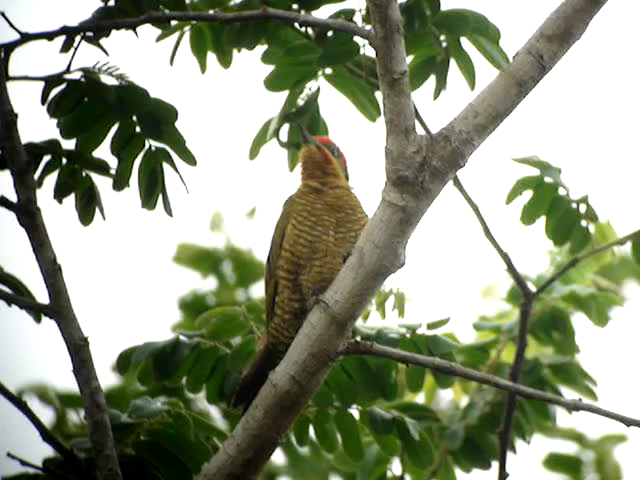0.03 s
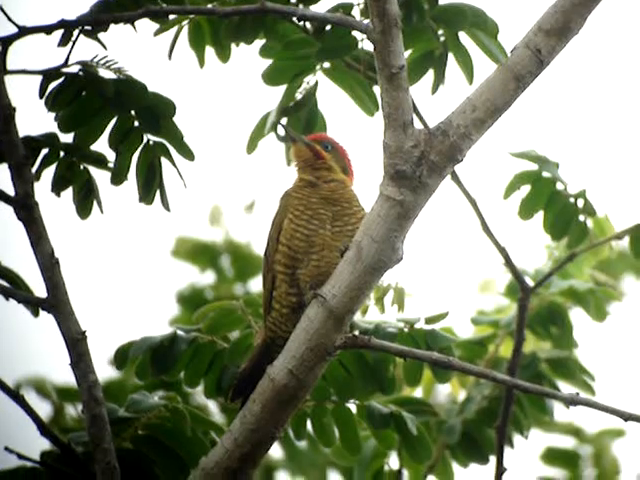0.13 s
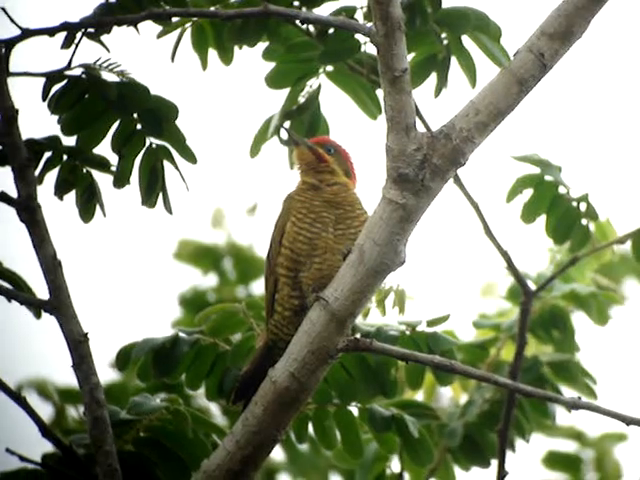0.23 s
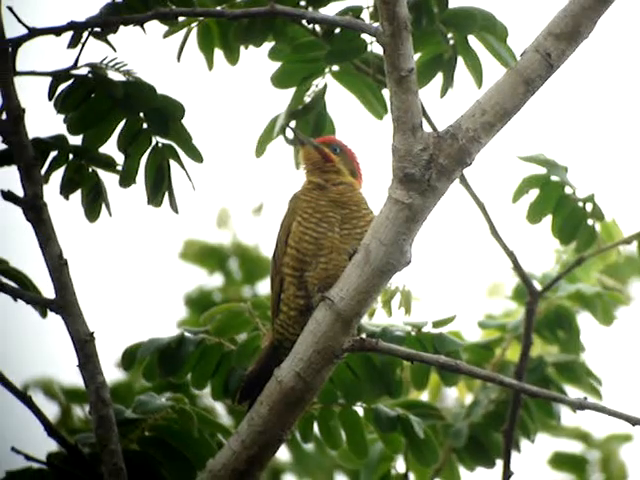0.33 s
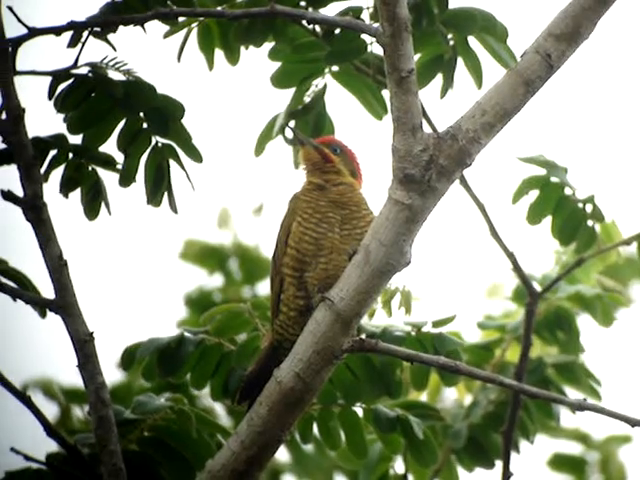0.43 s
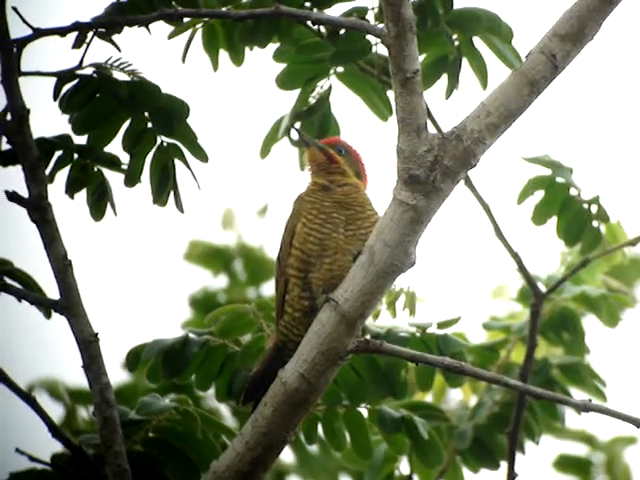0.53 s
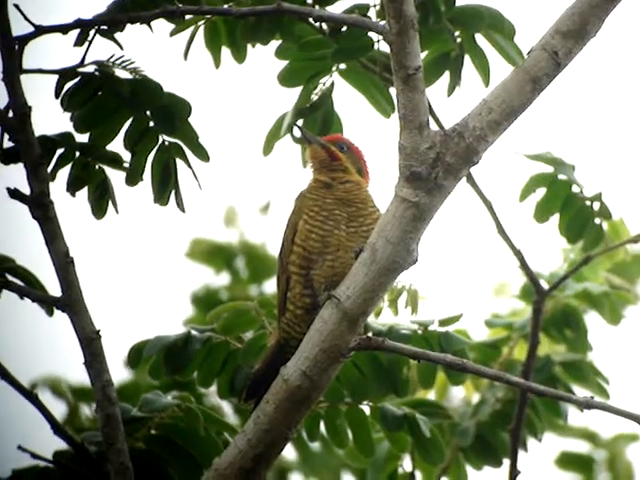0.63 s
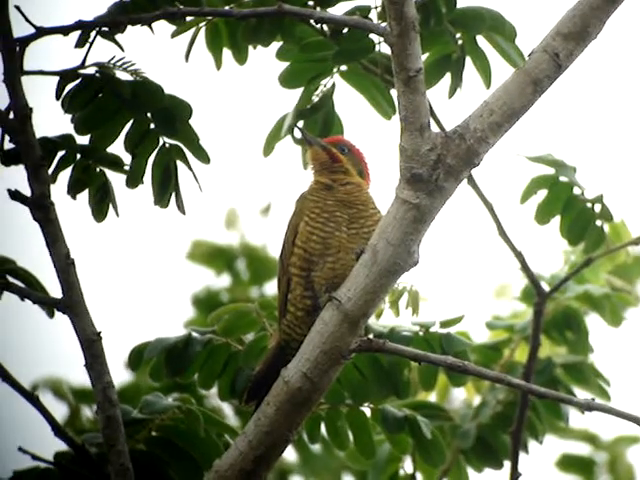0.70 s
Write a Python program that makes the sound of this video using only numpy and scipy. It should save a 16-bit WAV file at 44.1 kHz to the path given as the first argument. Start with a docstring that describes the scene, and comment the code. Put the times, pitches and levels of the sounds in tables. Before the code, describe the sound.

A high, slightly pulsing insect hiss starts with a soft low bump at 0.1 seconds and continues throughout, over a gentle wash of distant foliage. A small click snaps near the microphone just afterward. From 0.2 to 0.7 seconds a bird gives five short, low, falling chirps. Farther birds warble faintly on and off, with thin whistles from 0.8 to 1.4 seconds, lightly echoing among the trees.

```python
"""A warm wetland: insects hiss in the trees, their scraping filtered by narrow resonances, over a soft
wash of distant foliage. One bird gives five low falling chirps; farther birds warble and whistle
faintly, all as gliding notes with a diffuse echo from the trees. The sound switches on with a soft low
bump, and a small hard part snaps once near the microphone, ringing in its damped modes."""
import sys
import numpy as np
from scipy import signal
from scipy.fft import rfft, irfft
from scipy.io import wavfile
from scipy.ndimage import uniform_filter1d

SR = 44100
rng = np.random.default_rng(int(sys.argv[2]) if len(sys.argv) > 2 else 0)


def dump_mix(stems):
    """Bounce the given channels to the path in sys.argv[1] as a 16-bit WAV at rate SR."""
    frames = np.atleast_2d(stems).T  # one column per channel
    limited = np.clip(frames, -1, 1)  # hard clip at full scale
    pcm = np.round(limited * 32767).astype(np.int16)
    wavfile.write(sys.argv[1], SR, pcm)


N = 68355
T = np.arange(N) / SR


def amp(db):
    """Amplitude ratio of a level in decibels."""
    return 10 ** (np.asarray(db) / 20)


def unit(x):
    """Normalisation to rms 1."""
    return x / np.sqrt(np.mean(x ** 2) + 1e-20)


def add(mix, start_s, sound):
    """Superposition: a sound joins the mix at its start time."""
    part = mix[max(round(start_s * SR), 0):][:len(sound)]
    part += sound[:len(part)]


def drift(rate_hz):
    """Low-passed noise: a random wander of rms 1."""
    lowpass = np.exp(-(np.fft.rfftfreq(N, 1 / SR) / rate_hz) ** 2)
    return unit(irfft(rfft(rng.standard_normal(N)) * lowpass, N))


def resonate(x, hz, width_hz):
    """Forced response of a double-pole resonance, steady or gliding, at rms 1."""
    carrier = np.exp(2j * np.pi * np.cumsum(hz * np.ones(len(x))) / SR)
    pole = np.exp(-np.pi * abs(width_hz) / SR)
    baseband = signal.lfilter([1], [1, -2 * pole, pole * pole], x / carrier)
    return unit((carrier * baseband).real)


def progress(length_s):
    """Normalised time, 0 to 1 over a note."""
    return np.linspace(0, 1, max(round(length_s * SR), 2))


def swell(u):
    """Amplitude envelope with a rounded rise and fall."""
    return np.sqrt(abs(np.sin(np.pi * u)))


def tone(hz):
    """A sinusoid of rms 1 whose phase is the integral of its frequency."""
    return np.sqrt(2) * np.sin(2 * np.pi * (np.cumsum(hz) / SR + rng.random()))


def trees(x, wet_db, t60_s=0.28, echoes_per_s=2000):
    """Scattering by trees adds a diffuse echo that decays exponentially."""
    t = T[:SR // 2]
    echoes = rng.standard_normal(len(t)) * (rng.random(len(t)) < echoes_per_s / SR)
    tail = echoes * amp(-60 * t / t60_s) * (t > .006)
    return x + amp(wet_db) * signal.fftconvolve(x, tail / np.linalg.norm(tail))[:N]


def air(level_db=-56, patchy_db=1.94):
    """Distant foliage gives broadband noise, its spectrum faintly patchy in time and frequency."""
    # Each row: frequency in Hz, relative spectral density in dB.
    spectrum = [(25, -18.5), (80, -9.5), (160, -4), (300, 0), (600, -1.83), (1100, -3.5), (2400, -4.5),
                (4000, -9), (7500, -10), (10000, -16)]
    knots_hz, knots_db = np.transpose(spectrum)
    hz, _, frames = signal.stft(rng.standard_normal(N), SR, nperseg=1024, noverlap=768)
    patches = uniform_filter1d(rng.standard_normal(frames.shape), size=10, axis=0)
    patches = unit(uniform_filter1d(patches, size=10, axis=1))
    shape_db = np.interp(np.log(hz + 1), np.log(knots_hz), knots_db)
    frames *= amp(shape_db[:, None] + patchy_db * patches)
    return amp(level_db) * unit(signal.istft(frames, nperseg=1024, noverlap=768)[1][:N])


def whistlers(far_start_s=.79, far_length_s=.35, far_db=-63.5):
    """Nearly pure tones seesaw high up; a far, blurred whistle sinks as narrowband noise."""
    # Each row: start and length in seconds, first and last frequency in Hz, level in dB.
    whistles = [(1.082, .05, 4770, 4650, -62.5), (1.13, 0.047, 4580, 4600, -67.5),
                (1.166, 0.039, 4800, 4560, -65), (1.213, .035, 4580, 4550, -63),
                (1.25, 0.079, 4710, 4620, -68.5), (1.306, .035, 4600, 4550, -62),
                (1.332, .045, 4710, 4640, -66.5), (1.381, .04, 4600, 4540, -67)]
    out = np.zeros(N)
    for start, length, first_hz, last_hz, db in whistles:
        u = progress(length)
        add(out, start, amp(db) * swell(u) * tone(first_hz + (last_hz - first_hz) * u))
    u = progress(far_length_s)
    far = resonate(rng.standard_normal(len(u)), hz=np.linspace(2030, 1800, len(u)), width_hz=150)
    add(out, far_start_s, amp(far_db) * swell(u) * far)
    return trees(out, wet_db=-5.5)


def warbler(lowest_at=.48, jitter=0.0056, flutter_db=1.6):
    """Frequency modulation: a bird's notes dip and rise, while farther birds merge into a noise band."""
    # Each row: start and length in seconds, first, lowest and last frequency in Hz, level in dB.
    warbles = [(0.23, .075, 3200, 3015, 3300, -69), (0.384, 0.058, 3250, 2867, 3050, -64),
               (.45, 0.11, 3500, 2880, 3250, -61), (0.645, 0.092, 3100, 2740, 3006, -61.5),
               (1.151, 0.054, 3150, 2780, 2960, -60.5), (1.202, .117, 3457, 2858, 3470, -59),
               (1.413, 0.059, 3150, 2872, 3140, -61), (1.475, 0.089, 3450, 2820, 3230, -60.5)]
    # The band of farther birds: centre and width in Hz, level in dB.
    chorus = (3137, 360, -69.5)
    out = np.zeros(N)
    for start, length, first_hz, low_hz, last_hz, db in warbles:
        u = progress(length)
        bend = np.interp(u, [0, lowest_at, 1], [-1, 0, 1])
        span_hz = np.where(bend < 0, first_hz, last_hz) - low_hz
        hz = low_hz + span_hz * np.sin(np.pi / 2 * bend) ** 2
        waver = 1 + jitter * drift(200)[:len(u)]
        add(out, start, amp(db) * swell(u) * tone(hz * waver))
    bird = trees(out * amp(flutter_db * drift(90)), wet_db=-6)
    hz, width, db = chorus
    return bird + amp(db) * resonate(rng.standard_normal(N), hz, width)


def chirps(top_hz=2280, end_hz=1170, floor=.22):
    """Linear frequency sweeps: each call of a bird falls nearly an octave and is loudest halfway."""
    # Each row: start and length in seconds, level in dB.
    calls = [(.162, .038, -49.7), (.289, .037, -49.7), (.413, .035, -49.2), (.537, .033, -49.5),
             (.654, .031, -49)]
    out = np.zeros(N)
    for start, length, db in calls:
        u = progress(length)
        accent = np.exp(-((u - .49) / .18) ** 2)
        envelope = swell(u) * (floor + (1 - floor) * accent)
        add(out, start, amp(db) * envelope * tone(top_hz + (end_hz - top_hz) * u))
    return trees(out, wet_db=-7)


def scraping(rate_hz, jitter=0.044, depth=0.57, flutter_db=2.0):
    """Stridulation: an insect's rapid, uneven strokes modulate the amplitude of friction noise."""
    strokes = np.cumsum(rate_hz * (1 + jitter * drift(45))) / SR
    bursts = 1 - depth * np.sin(np.pi * strokes) ** 4
    return rng.standard_normal(N) * bursts * amp(flutter_db * drift(150))


def insects(rasp_start_s=.58, rasp_length_s=.2, rasp_db=-58.5):
    """Source and filter: scraping drives resonances in two bands of hiss and a brief higher rasp."""
    # Each row: time in seconds, levels of the lower and upper band in dB before their trims.
    hiss = [(0.09, -55, -53.5), (0.18, -56.5, -86), (0.25, -51.5, -60.5), (0.34, -54, -59.5),
            (0.41, -49.5, -63), (0.56, -55, -64), (0.64, -54.5, -56.5), (0.72, -53.5, -55.5),
            (0.82, -48.8, -57), (0.92, -54.5, -58.5), (1.05, -54.5, -57.5), (1.2, -50.5, -55.9),
            (1.33, -58, -62.5), (1.44, -52.5, -65), (1.54, -51.5, -54.8)]
    # Resonances of each band. Each row: centre and width in Hz, relative level in dB.
    lower_rings = [(5828, 270, -2), (5605, 550, 1), (5340, 670, -7.5), (5726, 41, -11)]
    upper_rings = [(6265, 220, 0.59), (6460, 650, -1.7)]
    times, lower_db, upper_db = np.transpose(hiss)
    bands = (lower_rings, lower_db, 0.95, 64), (upper_rings, upper_db, 2, 54)
    out = np.zeros(N)
    for rings, level_db, trim_db, stroke_hz in bands:
        drive = scraping(stroke_hz)
        # Random signs make the resonances incoherent while they share one pulse.
        song = sum(amp(db) * resonate(drive * rng.choice([-1, 1], N), hz, width)
                   for hz, width, db in rings)
        out += amp(np.interp(T, times, level_db + trim_db)) * unit(song)
    u = progress(rasp_length_s)
    rasp = resonate(drive[:len(u)], hz=6650, width_hz=610)  # pulses at the same rate as the upper band
    add(out, rasp_start_s, amp(rasp_db) * swell(u) * rasp)
    return out


def click(start_s=.129, rise_s=0.00046, ring_db=-15.5, crack_db=-27, crack_t60_s=0.018, low_cut_hz=240):
    """Free vibration: a small hard part snaps with a burst of noise and rings in damped modes."""
    # Each row: frequency in Hz, relative level in dB, time to decay by 60 dB in seconds.
    modes = [(650, -4.5, 0.014), (751, -5, .025), (872, -1.5, 0.016), (1440, -18, 0.028),
             (2024, 3.5, 0.014), (2140, 0, .015), (2556, 0, .018), (3000, -3, 0.006), (3430, -9, .024),
             (3860, -12, 0.017), (4473, -8, 0.0095), (5580, -11, 0.012), (6400, -6, 0.0061),
             (7314, -23, 0.013)]
    out, t = np.zeros(N), T[:SR // 20]
    ring = sum((-1) ** k * amp(db - 60 * t / t60) * np.sin(2 * np.pi * hz * t)
               for k, (hz, db, t60) in enumerate(modes))
    crack = amp(crack_db - 60 * t / crack_t60_s) * rng.standard_normal(len(t))
    add(out, start_s, np.minimum(t / rise_s, 1) * (amp(ring_db) * ring + crack))
    return signal.sosfilt(signal.butter(2, low_cut_hz, "highpass", fs=SR, output="sos"), out)


def scene():
    """The pressures of all sources add at one microphone."""
    return (air() + insects() + chirps() + warbler() + whistlers() + click())[None]


def record(dry, on_s=.078, bump_db=-52.5, bump_hz=33, bump_decay_s=0.028, edge_hz=10080):
    """A switch-on transient, a low damped sinusoid, opens the sound; a low-pass limits the band."""
    t = np.maximum(T - on_s, 0)
    bump = amp(bump_db) * np.sin(2 * np.pi * bump_hz * t) * np.exp(-t / bump_decay_s)
    live = dry * np.minimum(t / .002, 1) + bump
    lowpass = signal.firwin(511, edge_hz, window=("kaiser", 9), fs=SR)
    return signal.oaconvolve(live, lowpass[None], "same")


dry = scene()
out = record(dry)
dump_mix(out)
```